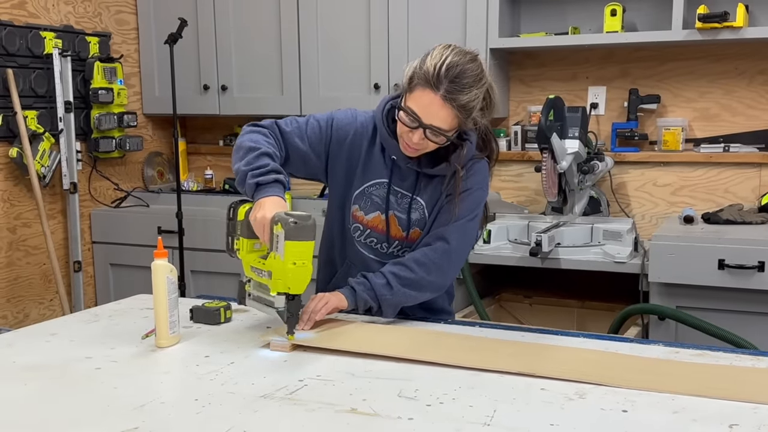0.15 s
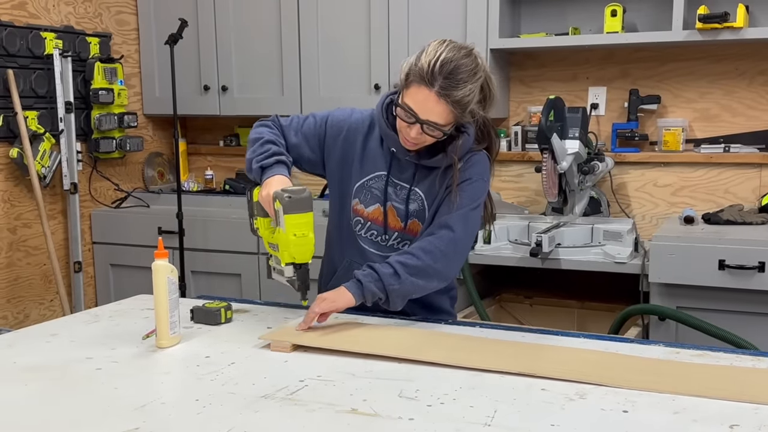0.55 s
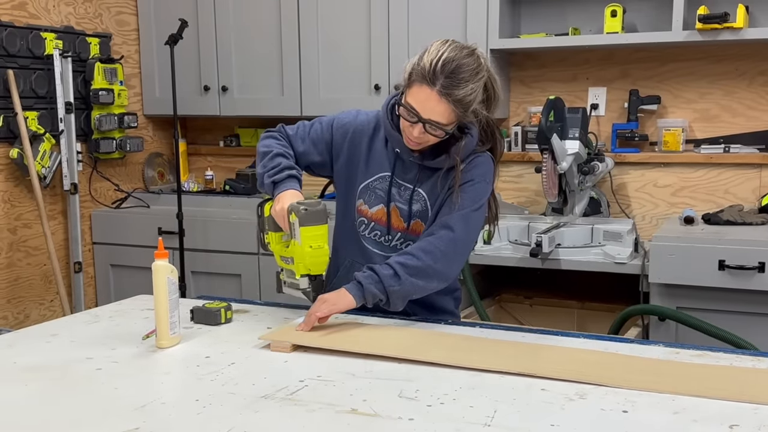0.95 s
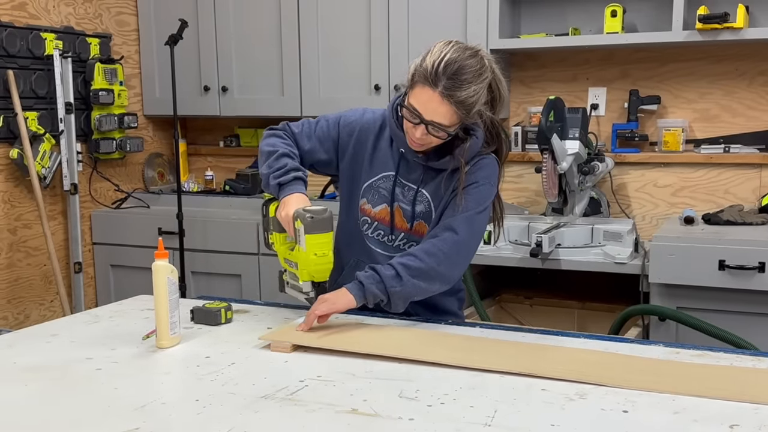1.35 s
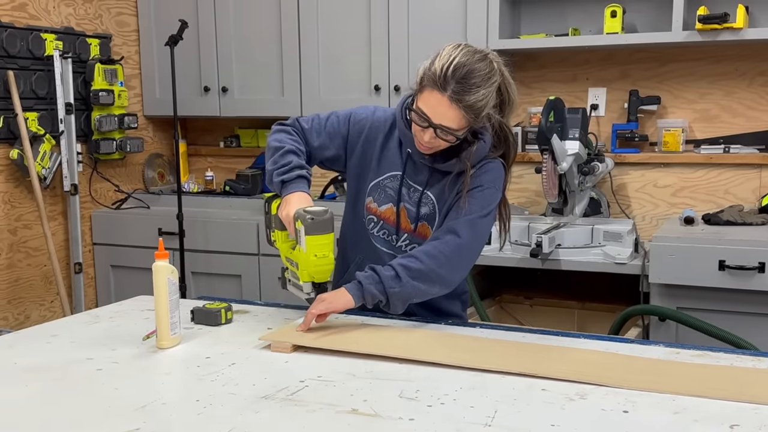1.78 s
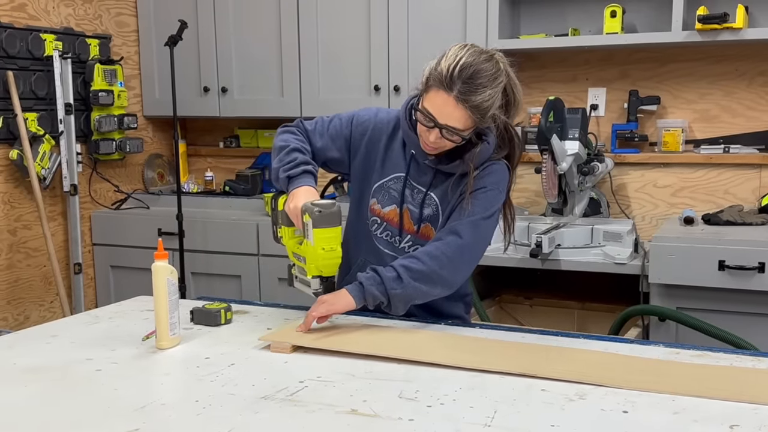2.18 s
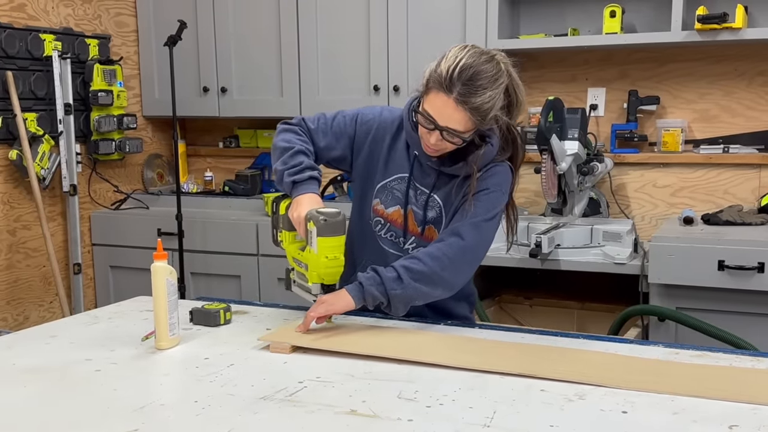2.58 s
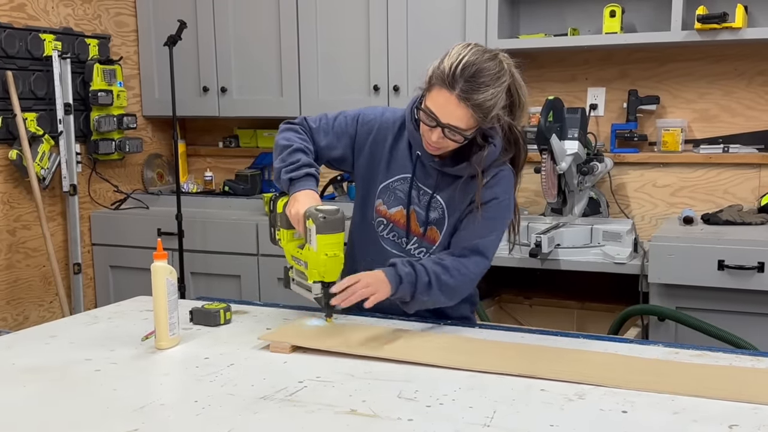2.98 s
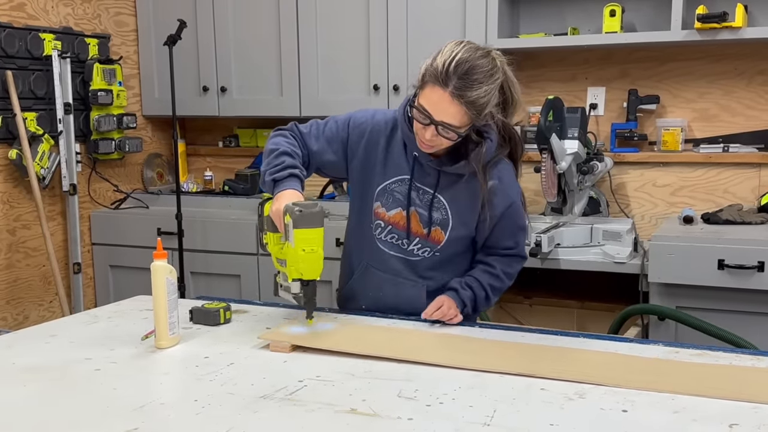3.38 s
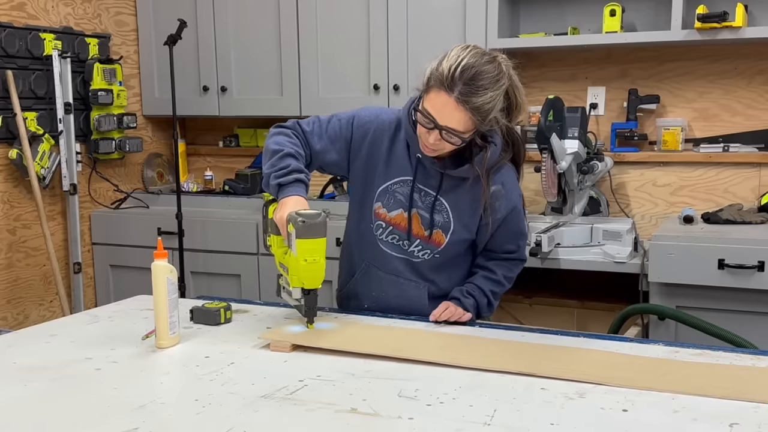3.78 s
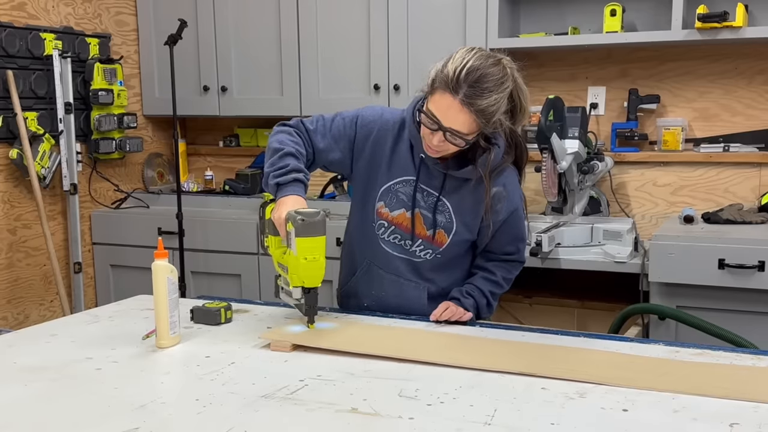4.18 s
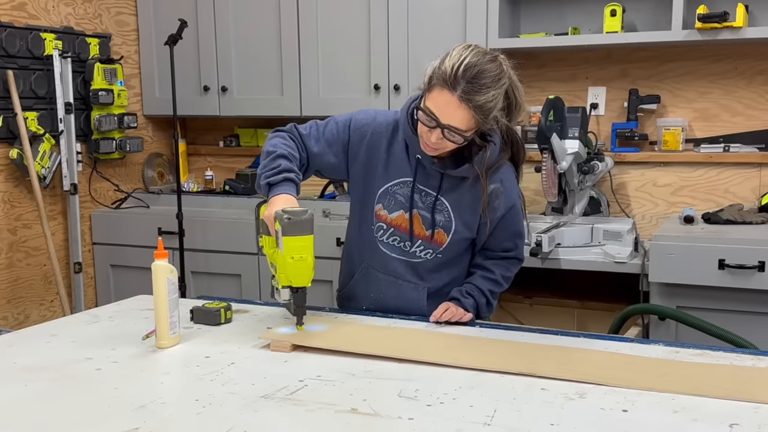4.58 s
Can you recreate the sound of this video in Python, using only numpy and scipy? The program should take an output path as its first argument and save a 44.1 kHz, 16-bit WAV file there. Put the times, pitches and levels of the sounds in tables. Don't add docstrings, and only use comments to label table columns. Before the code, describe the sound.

After the tail of an earlier shot, a cordless stapler knocks, winds up, slams and clacks three times on thin wood in a hard-walled workshop.

```python
import sys
import numpy as np
from scipy import signal
from scipy.fft import rfft, irfft
from scipy.io import wavfile

SR = 44100
rng = np.random.default_rng(int(sys.argv[2]) if len(sys.argv) > 2 else 0)


def transcribe(signal):
    frames = np.atleast_2d(signal).T
    limited = np.clip(frames, -1, 1)
    pcm = np.round(limited * 32767).astype(np.int16)
    wavfile.write(sys.argv[1], SR, pcm)


def magnitude_from_level(level_db):
    exponent = np.asarray(level_db, float) / 20
    return 10 ** exponent


N = 209122
LEAD = SR // 4
FULL = N + LEAD

# (time [s], crack [dB], bench [dB], boom [dB], rattle [dB])
BLOWS = [
    (-.045, 2, -5, -15, -9.5),
    (1.661, -1, -1, -14, -6),
    (2.770, 2.5, -1.5, -14.5, -7),
    (4.032, 1.5, -3.5, -12, -7),
]
# (time [s], crack [dB], air spring [Hz], air spring [dB], bench [dB])
CLACKS = [
    (0.099, -7.5, 424.2, -4.5, -26.5),
    (1.810, -13.5, 449.6, -13.5, -18.5),
    (2.913, -5, 398, -11, -17.5),
    (4.173, -6.5, 432, -12, -33.5),
]
# (start [s], release [s], whir [dB], arching tone [dB], air hiss [dB])
WIND_UPS = [
    (1.445, 1.662, -24.5, -34.5, -31.5),
    (2.549, 2.771, -23, -26, -29.5),
    (3.819, 4.038, -23, -20, -30.5),
]
# (start [s], end [s], whir [dB], hum [dB], air hiss at clack [dB])
RUN_OUTS = [
    (-.02, 0.309, -26.5, -40, -39.5),
    (1.681, 2.064, -24.5, -35.5, -40),
    (2.791, 3.187, -26.5, -35.5, -40.5),
    (4.051, 4.457, -25.5, -39.5, -42.5),
]
# (time [s], length [s], start [Hz], end [Hz], level [dB])
SQUEALS = [
    (1.585, 0.1, 564.3, 399, -21),
    (1.657, 0.008, 4060, 3950, -23.5),
    (2.69, 0.12, 563, 422, -25.5),
    (2.753, 0.014, 4333, 4340, -10.5),
    (3.948, .085, 595, 392, -30),
    (4.009, 0.019, 2292, 2093, -16.5),
    (4.02, 0.022, 4266, 4240, -10.5),
]
# (time [s], peak [dB], strip knock [dB], metal tick [dB], bench boom [dB])
KNOCKS = [
    (1.093, -35, -44, -44.5, -41.5),
    (1.31, -45, -61, -53.5, -60.5),
    (1.34, -28, -45.5, -53, -31),
    (2.299, -25, -34.5, -44.5, -38),
    (2.497, -26, -36, -37.5, -24.5),
    (3.497, -27.5, -32.5, -39, -34),
    (3.746, -24, -28.5, -41.5, -24),
    (4.568, -28, -33, -37.5, -34.5),
]
# (time [s], peak [dB])
CATCHES = [(1.34, -46), (1.4428, -33.5), (1.468, -29), (2.482, -50.5), (2.506, -43), (2.545, -27),
           (2.572, -23), (3.498, -45), (3.734, -53.5), (3.748, -37), (3.8155, -28.5), (3.841, -25.5)]

# (frequency [Hz], level [dB/Hz])
CRACK_SPECTRUM = [(120, -31), (200, -14.5), (480, -3), (930, -10), (2000, -1.5), (2500, -19), (5400, -18.5),
                  (6800, -12), (9000, -31), (13200, -19), (15800, -19.5)]
# (frequency [Hz], level [dB/Hz])
RATTLE_SPECTRUM = [(59, -43.5), (100, -0.5), (360, 0), (598, -8), (1160, -1.5), (1620, -16.5), (2320, -10),
                   (3080, -13.5), (6660, -16.5), (9000, -21.5), (11700, -56), (19800, -120)]
# (frequency [Hz], level [dB/Hz])
CLACK_SPECTRUM = [(120, -47.5), (200, 1.5), (550, -0.5), (1300, -7), (1970, 1), (3400, -4.5), (4600, -14),
                  (6900, -8), (9000, -16.5), (12900, -17.5), (15800, -20)]
# (frequency [Hz], level [dB/Hz])
WHIR_SPECTRUM = [(59, -47.5), (100, -33), (257, -9.5), (339, -10), (404, -10.5), (773, -15.5), (1020, -8.5),
                 (1840, -17), (3120, -23.5), (4820, -21.5), (6730, -22), (9590, -24.5), (11000, -71.5),
                 (14300, -103), (22000, -120)]
# (frequency [Hz], level [dB/Hz])
RUN_OUT_SPECTRUM = [(59, -56), (100, -8), (191, -29), (262, -14.5), (373, -3), (412, 1), (587, -14),
                    (1040, -9.5), (1240, -7), (3310, -12), (8520, -31.5), (9970, -51), (11000, -95.5),
                    (14300, -116), (22000, -120)]
# (frequency [Hz], level [dB/Hz])
HISS_SPECTRUM = [(8000, -22.5), (9800, 0), (12200, -0.5), (13500, -3.5), (15700, 1.5), (16100, -48.0)]
# (frequency [Hz], level [dB/Hz])
TICK_SPECTRUM = [(800, -17), (1400, -2.5), (2100, 4), (2900, -9.5), (3600, -10.5), (5000, -27), (8000, -22),
                 (13000, -38.5), (15800, -36.5)]
# (frequency [Hz], level [dB/Hz])
STRIP_SPECTRUM = [(150, -30), (300, -9.5), (700, 6.5), (1500, -3), (2200, -37.5), (4000, -38)]
# (frequency [Hz], level [dB/Hz])
CATCH_SPECTRUM = [(470, 3.5), (900, -2), (2000, -10.5), (3300, 0.5), (4700, -2), (7000, -9.5),
                  (10000, -16.5), (15000, -9.5), (16200, -30.5)]
# (frequency [Hz], level [dB/Hz])
AIR_SPECTRUM = [(15, -40.5), (25, -1.5), (82, 0), (110, -1), (349, -11), (530, -13), (1450, -29.5),
                (1730, -34), (2760, -25), (5240, -42), (7040, -19), (8360, -29), (9000, -21),
                (11700, -70.5), (19800, -120)]

# (multiple of the arching tone [1], width [Hz], level [dB])
GEAR_BANDS = [(9.3, 220, -2), (11.8, 220, -5.5), (15, 170, -9.5), (16.8, 160, -10.5), (19.5, 300, -12.5)]
# (frequency [Hz], width [Hz], level [dB])
SHELL_BANDS = [(2830, 75, -19.5), (3946, 300, -7), (5940, 180, -11), (6500, 220, -11.5)]
# (frequency [Hz], level [dB], t60 [s])
FRAME_MODES = [(56.7, -24, 0.65), (75.5, -2, 0.19), (103.5, -7, 0.15)]
# (frequency [Hz], level [dB], t60 [s])
BENCH_MODES = [(123, -4.5, 0.12), (148, -7, .14), (186.7, 1.5, 0.13), (230.6, -3.5, 0.13), (289.7, -4, .12),
               (336, -7.5, 0.19), (432, -4.5, 0.074)]
# (frequency [Hz], level [dB], t60 [s])
HOUSING_MODES = [(785, -7, 0.088), (1954, 3, 0.13), (2247, 0.5, 0.065), (2510, -15, 0.047),
                 (3410, 1.5, 0.15)]
# (frequency [Hz], level [dB], t60 [s])
PLY_MODES = [(745, -4.5, 0.47), (820, -0.5, 0.11), (1060, -9, 0.094), (1500, 0, 0.093)]

# (frequency [Hz], t60 [s])
GARAGE_T60 = [(60, 1), (200, 0.52), (500, 0.63), (1500, 0.8), (4000, 0.74), (6000, 0.68), (9000, 0.54),
              (14000, 0.31)]
# (frequency [Hz], share [1])
GARAGE_WIDTH = [(60, .08), (250, .3), (500, .85), (1000, 1.3), (2000, .9), (4000, 1.1), (9300, .8),
                (10400, .02), (13000, .02)]
# (frequency [Hz], lag [half turns])
PORT_LAG = [(1200, 0), (3000, .3), (8000, .45), (9600, .6), (10400, 1), (12100, 1), (13000, 2)]
# (frequency [Hz], level [dB])
GATE_DB = [(7000, -120), (8500, -77.5), (10000, -84), (13000, -78), (16000, -75)]

ARCH_MID_HZ, SWING_HZ, TOP_BEFORE_S, HALF_ARCH_S = 265.4, 80, 0.078, 0.17
SPIN_UP_DB, SPIN_UP_S, CLIMB_DB_PER_S, STRAIN_DB, STRAIN_S = -9.5, 0.034, 47.5, 1.5, 0.012
TONE_DB_PER_HZ, HISS_DB_PER_HZ = 0.17, 0.08
PULL_DB_PER_S, HOME_DB, HOME_S, BRAKE_S, BRAKE_DB = 127.5, 4.5, 0.02, 0.089, -12.5
LEAK_DB_PER_S, VENT_DB_PER_S, SHUT_DB, HUM_DB_PER_S = 73.5, 124.5, -16, 20
PING_HZ, PING_T60_S, BOUNCE_S = 2300, 0.008, 0.007
MAINS_HZ, MAINS_DB, AIR_DB = 42, -70.5, -68


def blows(mix):
    for s, crack_db, bench_db, boom_db, rattle_db in BLOWS:
        bench = ring(BENCH_MODES, 0.012) + 0.66 * thud(700, 170, 0.051)
        add(mix, s, magnitude_from_level(crack_db) * burst(CRACK_SPECTRUM, 0.0061, 0.0075))
        add(mix, s, magnitude_from_level(bench_db) * bench + magnitude_from_level(boom_db) * ring(FRAME_MODES, 0.016))
        add(mix, s + 0.016, magnitude_from_level(rattle_db) * burst(RATTLE_SPECTRUM, 0.0068, 0.3))
    return mix


def clacks(mix):
    for s, crack_db, air_hz, air_db, bench_db in CLACKS:
        add(mix, s, magnitude_from_level(air_db) * air_spring(air_hz))
        add(mix, s, magnitude_from_level(crack_db) * burst(CLACK_SPECTRUM, 0.002, 0.12))
        add(mix, s, magnitude_from_level(crack_db - 2.5) * ring(HOUSING_MODES, 0.0078))
        add(mix, s, magnitude_from_level(bench_db) * ring(BENCH_MODES, 0.013))
    return mix


def air_spring(hz):
    t = np.arange(SR // 2) / SR
    beat = magnitude_from_level(-60 * t / 0.45) * np.cos(np.pi * 11 * t) / (1 + (t / 0.04) ** 4)
    return beat * np.minimum(t / 0.00093, 1) * np.sin(2 * np.pi * hz * t)


def wind_up(mix):
    for s, release, whir_db, tone_db, hiss_db in WIND_UPS:
        t, ends = span(s, release)
        size = len(t)
        from_top_s = t - release + TOP_BEFORE_S
        arch = np.cos(np.pi * from_top_s / HALF_ARCH_S)
        arch_hz = ARCH_MID_HZ + SWING_HZ * arch
        below_top_hz = SWING_HZ * (1 - arch)
        spin_up_db = SPIN_UP_DB * np.exp((s - t) / SPIN_UP_S)
        strain_db = STRAIN_DB * np.exp((t - release) / STRAIN_S)
        effort_db = spin_up_db + strain_db + CLIMB_DB_PER_S * from_top_s
        cycles = np.cumsum(arch_hz) / SR

        grit = rng.standard_normal(size)
        mesh = sum(magnitude_from_level(db) * evened(resonate(grit, k * arch_hz, w)) for k, w, db in GEAR_BANDS)
        shell = sum(magnitude_from_level(db) * evened(resonate(grit, hz, w)) for hz, w, db in SHELL_BANDS)
        load = np.linspace(0, 1.3, size)
        throb = 1 + 0.12 * np.cos(2 * np.pi * cycles)
        whir = evened(noise(WHIR_SPECTRUM, size) + mesh * load + shell) * throb
        tone = np.sqrt(2) * np.sin(2 * np.pi * cycles)

        sound = magnitude_from_level(whir_db + effort_db) * whir
        sound = sound + magnitude_from_level(tone_db - TONE_DB_PER_HZ * below_top_hz) * tone
        sound = sound + magnitude_from_level(hiss_db - HISS_DB_PER_HZ * below_top_hz) * noise(HISS_SPECTRUM, size)
        add(mix, s, ends * sound)
    return mix


def run_out(mix):
    for (s, end, whir_db, hum_db, hiss_db), (home, *_) in zip(RUN_OUTS, CLACKS):
        t, ends = span(s, end)
        size = len(t)
        before_s = np.maximum(home - t, 0)
        after_s = np.maximum(t - home, 0)
        brake = np.clip(1 + (t - end) / BRAKE_S, 0, 1)
        run_db = whir_db - PULL_DB_PER_S * before_s + HOME_DB * np.exp(-after_s / HOME_S) + BRAKE_DB * brake
        air_db = hiss_db + LEAK_DB_PER_S * before_s - VENT_DB_PER_S * after_s + SHUT_DB * brake
        hum = evened(resonate(rng.standard_normal(size), 415, 110))
        sound = magnitude_from_level(run_db) * noise(RUN_OUT_SPECTRUM, size)
        sound = sound + magnitude_from_level(hum_db - HUM_DB_PER_S * after_s) * hum
        sound = sound + magnitude_from_level(air_db) * noise(HISS_SPECTRUM, size)
        add(mix, s, ends * sound)
    return mix


def squeals(mix):
    for s, length_s, start_hz, end_hz, db in SQUEALS:
        hz = np.linspace(start_hz, end_hz, round(length_s * SR))
        add(mix, s, magnitude_from_level(db) * np.hanning(len(hz)) * np.sin(2 * np.pi * np.cumsum(hz) / SR))
    return mix


def knocks(mix):
    for s, db, strip_db, tick_db, boom_db in KNOCKS:
        add(mix, s, magnitude_from_level(tick_db - 1.5) * burst(TICK_SPECTRUM, 0.0017, 0.2))
        add(mix, s, magnitude_from_level(strip_db - 2.0) * burst(STRIP_SPECTRUM, 0.01, 0.19))
        add(mix, s, magnitude_from_level(strip_db - 2.5) * ply())
        add(mix, s, magnitude_from_level(tick_db + 8.5) * ping())
        add(mix, s, magnitude_from_level(db + 6.5) * ring(BENCH_MODES, 0.0046))
        add(mix, s, magnitude_from_level(db + 1.0) * thud(605, 210, 0.12))
        add(mix, s, magnitude_from_level(boom_db + 11.5) * ring(FRAME_MODES, 0.0076))
    return mix


def ply():
    t = np.arange(SR // 2) / SR
    modes = sum(magnitude_from_level(db - 60 * t / t60) * np.sin(2 * np.pi * hz * t) for hz, db, t60 in PLY_MODES)
    return np.minimum(t / 0.0022, 1) * modes


def ping():
    t = np.arange(SR // 10) / SR
    once = magnitude_from_level(-60 * t / PING_T60_S) * np.sin(2 * np.pi * PING_HZ * t)
    return once + 0.55 * np.roll(once, round(BOUNCE_S * SR))


def catches(mix):
    for s, db in CATCHES:
        add(mix, s, magnitude_from_level(db + 0.5) * burst(CATCH_SPECTRUM, 0.001, 0.058))
    return mix


def garage(x, wet_db):
    hz, t, z = signal.stft(rng.standard_normal((2, 3 * SR // 2)), SR, nperseg=256)
    z = z * magnitude_from_level(-60 * t / read(GARAGE_T60, hz)[:, None])
    z[1] *= np.clip(read(GARAGE_WIDTH, hz), 0, 2)[:, None]
    echoes = signal.istft(z, SR, nperseg=256)[1]
    build_up = np.minimum(np.arange(echoes.shape[1]) / SR / 0.004, 1) ** 2
    same, other = echoes * build_up
    tail = np.array([same + other, same - other]) / np.linalg.norm(same)
    return x + magnitude_from_level(wet_db) * signal.fftconvolve(x[None], tail, axes=1)[:, :FULL]


def room_tone():
    same, other = noise(AIR_SPECTRUM, FULL), noise(AIR_SPECTRUM, FULL)
    hum = magnitude_from_level(MAINS_DB) * evened(resonate(rng.standard_normal(FULL), MAINS_HZ, 6))
    return hum + magnitude_from_level(AIR_DB) * np.array([same + 0.4 * other, same - 0.4 * other])


def ring(modes, spread_s):
    t, out = np.arange(SR // 2) / SR, 0
    for hz, db, t60 in modes:
        detune, phase = rng.uniform(-0.5, 1, 2)
        swell_s = spread_s * np.sqrt(300 / hz) + 1e-4
        swell = 1 - np.exp(-(t / swell_s) ** 2)
        wave = np.sin(2 * np.pi * hz * (1 + 0.0065 * detune) * t + np.pi * phase)
        out = out + magnitude_from_level(db - 60 * t / t60) * swell * wave
    return out / abs(out).max()


def thud(start_hz, end_hz, t60):
    t = np.arange(SR // 2) / SR
    hz = end_hz + (start_hz - end_hz) * np.exp(-t / 0.0054)
    return magnitude_from_level(-60 * t / t60) * np.minimum(t / 0.0049, 1) * np.sin(2 * np.pi * np.cumsum(hz) / SR)


def burst(spectrum, hold_s, t60):
    t = np.arange(16384) / SR
    decay = magnitude_from_level(-60 * np.maximum(t - hold_s, 0) / t60)
    return noise(spectrum, len(t)) * decay * np.minimum(t / 0.00014, 1)


def noise(spectrum, size):
    hz = np.fft.rfftfreq(size, 1 / SR)
    return evened(irfft(rfft(rng.standard_normal(size)) * magnitude_from_level(read(spectrum, hz)), size))


def resonate(x, hz, width_hz):
    turn = np.exp(2j * np.pi * np.cumsum(hz * np.ones(len(x))) / SR)
    r = np.exp(-np.pi * width_hz / SR)
    return 2 * (turn * signal.lfilter([1 - r], [1, -r], x / turn)).real


def evened(x):
    return x / np.sqrt(np.mean(x ** 2) + 1e-20)


def read(points, hz):
    f, value = np.transpose(points)
    return np.interp(np.log(hz + 1), np.log(f + 1), value)


def span(start_s, end_s):
    t = np.arange(start_s, end_s, 1 / SR)
    return t, signal.windows.tukey(len(t), 0.05)


def add(mix, s, sound):
    part = mix[LEAD + round(s * SR):][:len(sound)]
    part += sound[:len(part)]


def scene():
    wood = garage(catches(knocks(np.zeros(FULL))), -5.5)
    impacts = garage(clacks(blows(np.zeros(FULL))), -8.5)
    machine = garage(squeals(run_out(wind_up(np.zeros(FULL)))), -4.5)
    left, right = (wood + impacts + machine + room_tone())[:, LEAD:]
    lag = np.exp(-1j * np.pi * read(PORT_LAG, np.fft.rfftfreq(FULL, 1 / SR)))
    return np.array([left, irfft(rfft(right, FULL) * lag, FULL)[:N]])


def gate_treble(x):
    hz, t, z = signal.stft([x[0] + x[1], x[0] - x[1]], SR, nperseg=1024)
    bands = abs(z[:, :512].reshape(2, 64, 8, -1)) ** 2
    fickle_db = 6 * rng.standard_normal((2, 64, len(t) // 3 + 1))
    fickle_db = np.repeat(fickle_db, 3, axis=2)[:, :, :len(t)]
    power_db = 10 * np.log10(bands.mean(2) + 1e-20) + fickle_db
    over_db = power_db - read(GATE_DB, hz[4:512:8])[:, None]
    z[:, :512] *= np.repeat(np.clip(over_db / 3 + 0.5, 0, 1), 8, axis=1)
    both, apart = signal.istft(z, SR, nperseg=1024)[1][:, :N]
    return np.array([both + apart, both - apart]) / 2


def low_pass(x):
    return signal.sosfilt(signal.butter(12, 15960, fs=SR, output="sos"), x)


def record(dry):
    cut = signal.sosfilt(signal.butter(2, 62, "highpass", fs=SR, output="sos"), dry)
    overloaded = cut / (1 + abs(cut) ** 8.0) ** (1 / 8.0)
    return low_pass(gate_treble(overloaded))


dry = scene()
out = record(dry)
transcribe(out)
```